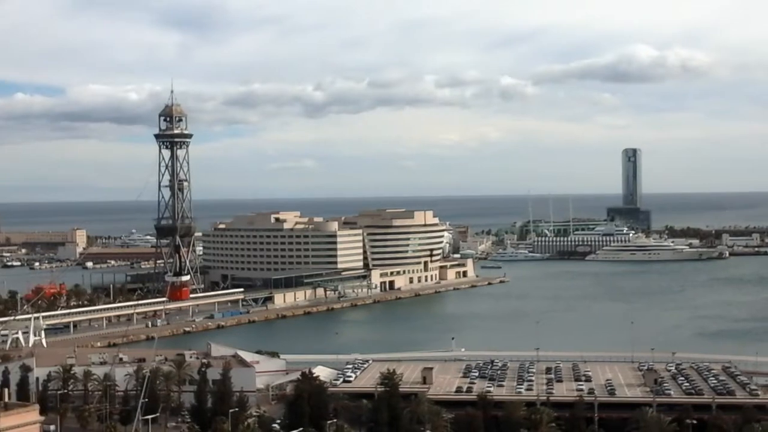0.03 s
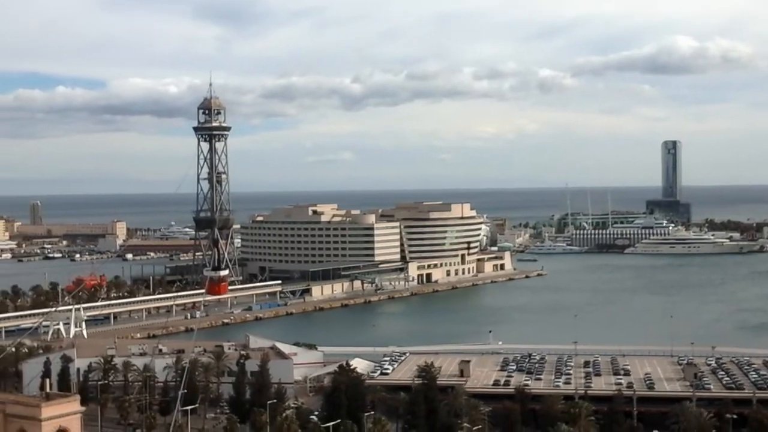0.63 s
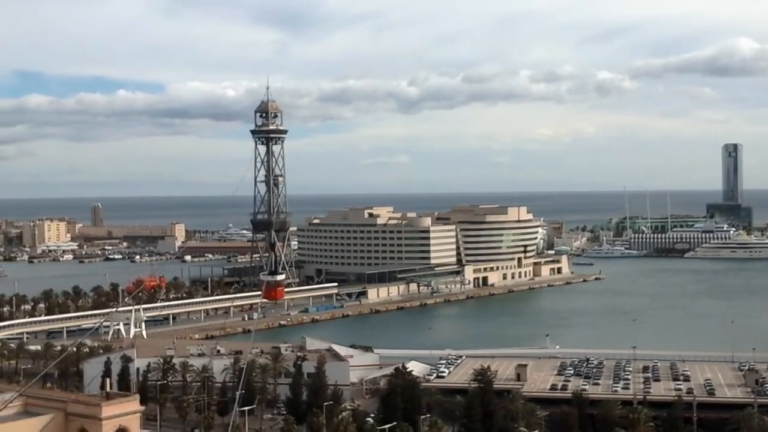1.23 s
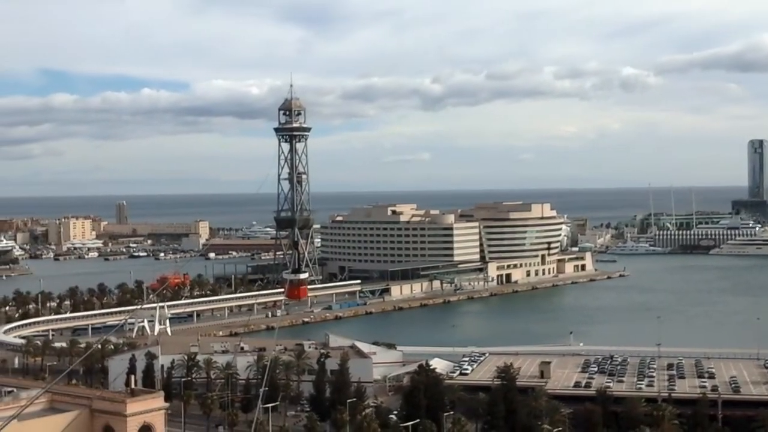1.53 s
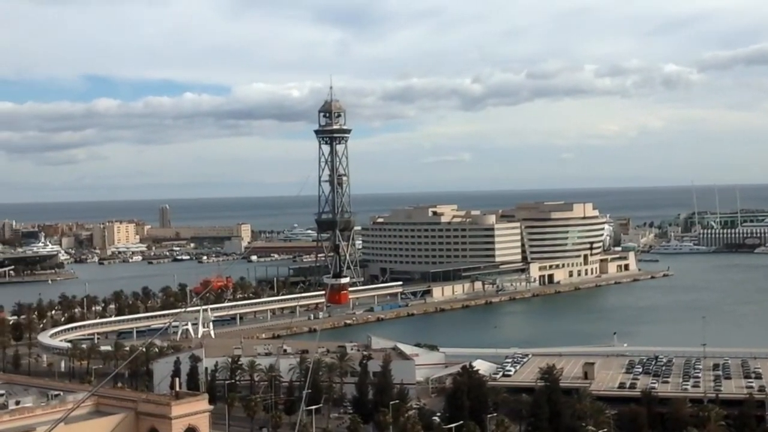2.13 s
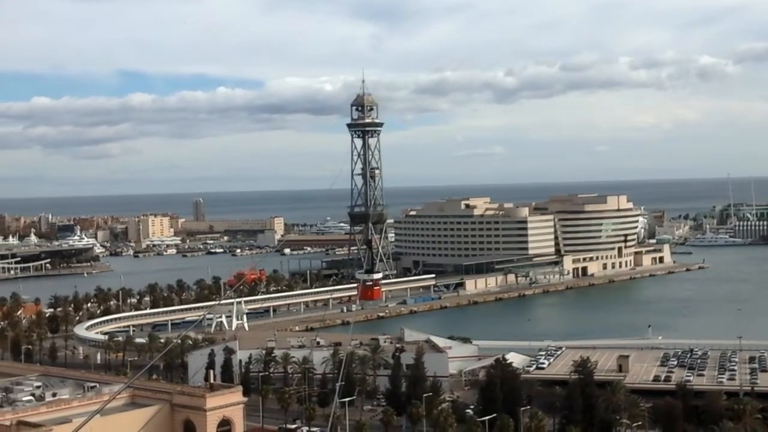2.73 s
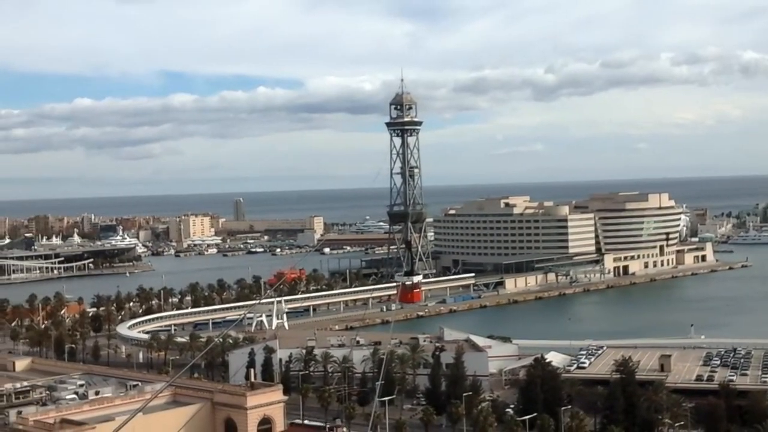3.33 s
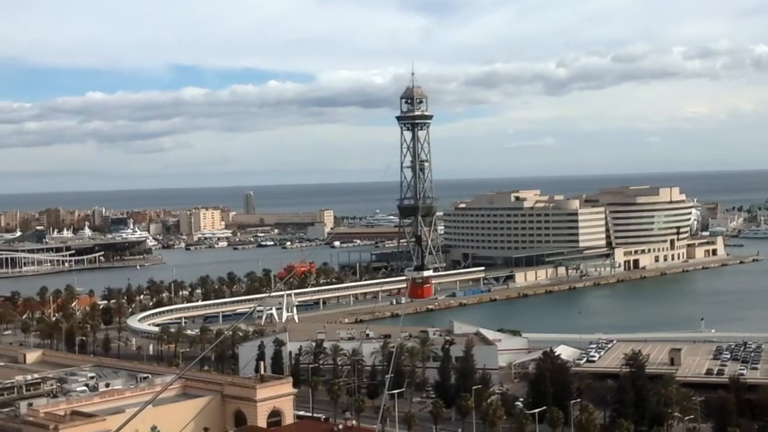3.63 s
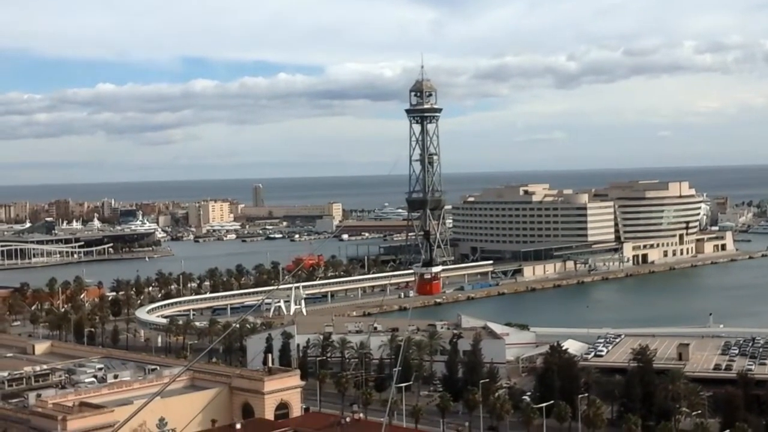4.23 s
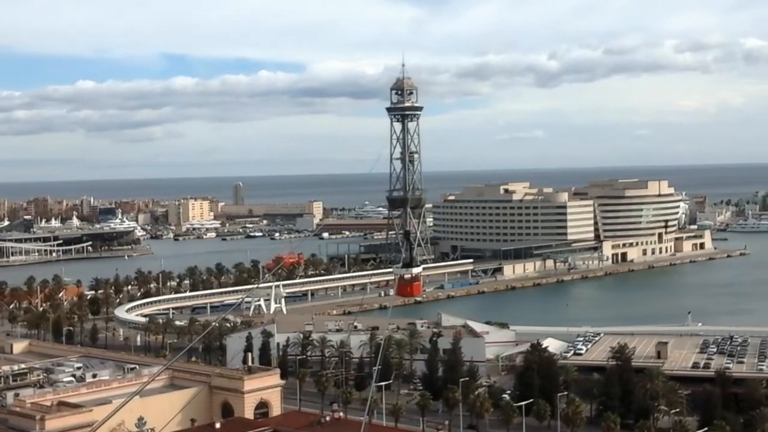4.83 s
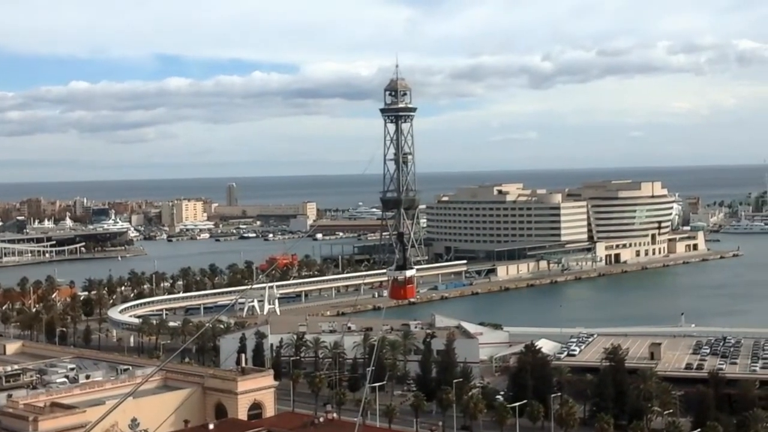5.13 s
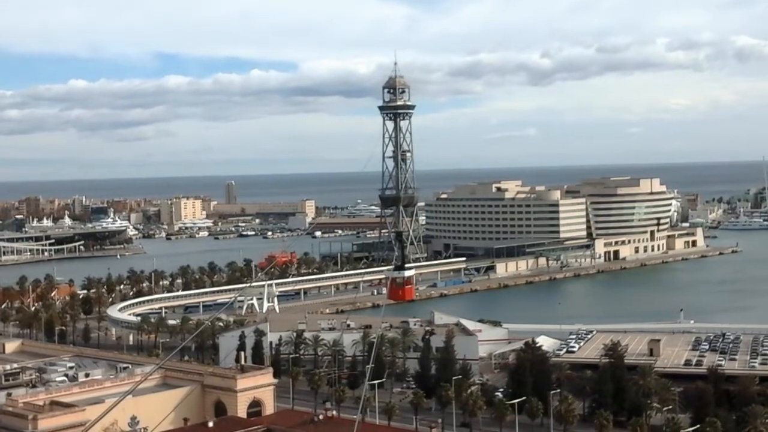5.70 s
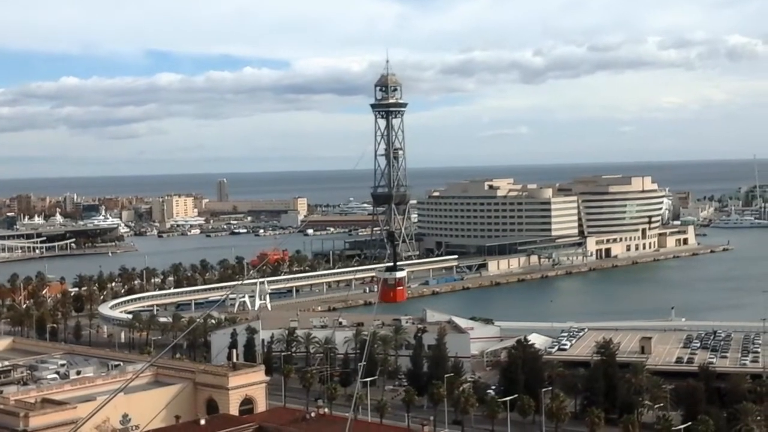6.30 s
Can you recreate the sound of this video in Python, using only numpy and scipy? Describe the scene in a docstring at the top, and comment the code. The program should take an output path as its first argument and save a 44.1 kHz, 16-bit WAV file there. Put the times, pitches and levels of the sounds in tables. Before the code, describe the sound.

Distant traffic roars under wind buffeting the microphone, while nearer vehicles rush past with echoing clatters and dull metal clanks.

```python
"""A breezy terrace high above a harbour. Far traffic roars and drones throughout, wind rumbles on the
microphone and the recorder hisses. First a nearer vehicle rushes by with echoing clatters, a dull
clank and a tiny tick. From about 1 s, swirls of air thump the microphone and softer rushes pass, with
a double rustle near 2 s. After 4 s a thin whine comes and goes and the drone surges briefly. Near 6 s
come more clatters, a second clank and a loud rush, then a short low thump as the sound cuts off."""
import sys
import numpy as np
from scipy import signal
from scipy.fft import rfft, irfft, next_fast_len
from scipy.io import wavfile

SR = 44100
rng = np.random.default_rng(int(sys.argv[2]) if len(sys.argv) > 2 else 0)


def pcm_store(signal):
    """Save signal as 16-bit PCM."""
    levels = np.round(np.clip(np.atleast_2d(signal), -1, 1) * 32767)
    wavfile.write(sys.argv[1], SR, levels.astype(np.int16).T)


N = 284886

# The tone colour of the far traffic. Each row: frequency in Hz, relative level in dB.
TRAFFIC_COLOUR = [(30, -32.5), (65, 1.5), (160, 4), (220, 2), (300, 2.5), (380, -3), (600, 0), (760, -0.5),
                  (890, -0.5), (1060, -5.5), (2000, -17), (2950, -30), (3600, -45), (4600, -53.5),
                  (8000, -78.5)]
# The low notes of far engines. Each row: pitch in Hz, width in Hz, relative level in dB.
ENGINE_NOTES = [(165.5, 35, 1.5), (232.4, 18, -7), (298, 37, -6.5)]
# Moments when the drone swells. Each row: start in seconds, length in seconds, relative level in dB.
ENGINE_SURGES = [(4.677, 0.064, -34.5), (4.876, 0.07, -25.5), (4.983, .05, -31.5), (5.083, 0.049, -28.5)]
# The tone colour of the wind. Each row: frequency in Hz, relative level in dB.
WIND_COLOUR = [(22, -48.5), (35, -27.5), (50, -5.5), (70, 2), (130, 1), (170, -4.5), (230, -2.5),
               (310, -15), (420, -26), (800, -35), (2000, -70.5), (8000, -130)]
# Swells of the rumble: gusts, then in the last row the short low thump as the sound cuts off.
# Each row: start in seconds, length in seconds, relative level in dB, extra deep bass in dB.
RUMBLE_SWELLS = [(0.403, 0.06, -25, 0.5), (0.805, 0.17, -26.5, 6.5), (1.214, 0.066, -23, -12),
                 (1.443, 0.025, -34.5, 2.5), (1.71, 0.12, -33, 8), (2.103, 0.042, -27, 7.5),
                 (2.438, 0.16, -26, 9), (2.593, 0.23, -28.5, 1.5), (2.862, 0.17, -29, 9),
                 (3.31, 0.065, -29.5, 4.5), (4.018, 0.057, -27.5, 6), (6.21, 0.091, -31, 8),
                 (6.418, 0.05, -12.5, 2)]
# The tone colour of rushes and clatters. Each row: frequency in Hz, relative level in dB.
STREET_COLOUR = [(200, -26.5), (450, -6), (720, -2.5), (900, 5.5), (1080, -4.5), (1300, -1.5), (1800, -5.5),
                 (2500, -10), (3300, -17.5), (3900, -23.5), (4500, -27.5), (5500, -35.5), (7200, -42),
                 (10000, -62)]
# Passing vehicles. Each row: loudest moment in seconds, time to fade by about 5 dB in seconds,
# level in dB, treble limit in Hz.
VEHICLE_PASSES = [(0.614, 0.33, -37.5, 4860), (1.779, 0.38, -43, 3620), (2.546, 0.47, -49.5, 4340),
                  (3.701, .4, -50.5, 4960), (5.897, 0.27, -36.5, 5450), (6.43, 0.13, -44.5, 5000)]
# Far knocks. Each row: start in seconds, rise time in seconds, level in dB, treble limit in Hz.
FAR_KNOCKS = [(.456, 0.054, -30.5, 4300), (0.57, 0.055, -42.5, 5500), (5.55, 0.025, -39, 5500),
              (5.75, 0.045, -29.5, 5600), (5.825, 0.076, -27, 5530)]
# Blows on metal. Each row: start in seconds, relative level in dB, brightness in dB per octave
# around 1000 Hz, a number that multiplies the pitch.
METAL_BLOWS = [(0.466, 0, -1.5, 1), (5.864, -7, 5, 1.12)]
# The notes the metal rings with. Each row: base pitch in Hz, width in Hz, relative level in dB.
METAL_NOTES = [(558, 170, -28), (793, 110, -29.5), (1140, 210, -32), (1803, 380, -31.5), (2210, 81, -33.5),
               (2560, 57, -45), (4070, 160, -57.5)]
# Low thumps: swirls of air on the microphone, then in the last row part of the closing thump.
# Each row: middle in seconds, relative level in dB, pitch in Hz.
LOW_THUMPS = [(0.982, -16, 149), (1.049, -12.5, 114), (1.071, -15, 131), (1.264, -7.5, 150),
              (1.332, -11, 242), (1.396, -13.5, 150), (1.504, -15.5, 125), (1.76, -13, 165),
              (1.834, -8.5, 141), (1.888, -11, 119), (2.414, -12, 160), (2.502, -9.5, 100),
              (2.548, -14, 100), (2.635, -13.5, 110), (2.661, -13.5, 150), (2.696, -10.5, 120),
              (2.754, -2, 219), (2.76, -12, 94), (2.813, -12.5, 290), (2.822, -10.5, 99.6),
              (2.873, -12, 141), (2.952, -16, 125), (3.361, -17.5, 120), (3.479, -13.5, 135),
              (4.191, -13.5, 84), (4.205, -14, 170), (4.218, -10, 114), (6.227, -13, 89), (6.335, -18, 141),
              (6.452, -13, 158)]
# Two rustles. Each row: start in seconds, length in seconds, level in dB.
DRY_SWISHES = [(1.788, .055, -46.5), (1.893, 0.045, -51.5)]
# Their tone colour. Each row: frequency in Hz, relative level in dB.
SWISH_COLOUR = [(1200, -16), (2300, 2), (3050, -2.5), (3650, -10), (4150, -22.5), (5600, -37), (8000, -54)]
# Thin whines. Each row: start in seconds, length in seconds, relative level in dB, first pitch in Hz,
# last pitch in Hz, level of the rough edge in dB compared with the core.
WHINE_NOTES = [(4.075, 0.21, -85.5, 6190, 6100, -0.5), (4.31, .14, -87, 6130, 6130, -2),
               (4.595, 0.13, -83, 6220, 6270, -3), (4.8, .44, -93.5, 6230, 6220, -4.5),
               (5.251, 0.34, -79.5, 6230, 6220, -2.5), (5.525, 0.58, -79, 6210, 6220, -2),
               (6.112, .28, -70, 6200, 6145, -9)]


def undb(db):
    """Turn decibels (dB) into a number to multiply a sound by."""
    return 10 ** (np.asarray(db) / 20)


def unit(x):
    """Scale a signal so that its average strength (root mean square) is 1."""
    return x / np.sqrt(np.mean(x ** 2))


def wander(rate):
    """A smooth random curve of strength 1 that changes about rate times a second."""
    size = next_fast_len(N)
    hz = np.fft.rfftfreq(size, 1 / SR)
    spectrum = rfft(rng.standard_normal(size)) * np.exp(-(hz / rate) ** 2)
    return unit(irfft(spectrum, size)[:N])


def noise_bands(colour, count):
    """Split noise of a given tone colour into bands, low to high; return their centres and sounds."""
    hz, db = np.transpose(colour)
    size = next_fast_len(N)
    octave = np.log2(np.fft.rfftfreq(size, 1 / SR) + 1)
    spectrum = rfft(rng.standard_normal(size)) * undb(np.interp(octave, np.log2(hz), db))
    centres = np.geomspace(hz[0], hz[-1], count)
    shares = [np.interp(octave, np.log2(centres), row) for row in np.eye(count)]
    bands = np.array([irfft(spectrum * share, size)[:N] for share in shares])
    return centres, bands / np.std(bands.sum(axis=0))


def blurred_tone(hz, width_hz):
    """A tone that wavers at random; the wider it is, the more it sounds like noise."""
    phase = 2 * np.pi * np.cumsum(hz * np.ones(N)) / SR
    return wander(width_hz) * np.cos(phase) + wander(width_hz) * np.sin(phase)


def envelope(start, length, rise_s, fade_s):
    """A loudness curve: it rises, holds until length seconds after the start, then dies away."""
    age = np.arange(N) / SR - start
    return np.clip(age / rise_s, 0, 1) * np.exp(-np.maximum(age - length, 0) / fade_s)


def swelling(steady_db, swells, rise_s, fade_s):
    """A loudness curve that adds short swells to a steady level."""
    power = sum((undb(db) * envelope(start, length, rise_s, fade_s)) ** 2 for start, length, db in swells)
    return np.sqrt(undb(steady_db) ** 2 + power)


def street_noise(events, steepness=7):
    """Broad noise shaped by events, each a loudness curve and a treble limit in Hz."""
    centres, bands = noise_bands(STREET_COLOUR, count=14)
    powers = np.array([loudness ** 2 for loudness, _ in events])
    limits = np.array([limit_hz for _, limit_hz in events])
    shares = [1 / (1 + (hz / limits) ** steepness) for hz in centres]
    return sum(band * np.sqrt(share @ powers) for band, share in zip(bands, shares))


def far_traffic(level_db=-29.5, swell_db=0.3, flicker_db=0.65):
    """Many far engines and tyres blend; moving air makes each band waver on the long way up."""
    _, bands = noise_bands(TRAFFIC_COLOUR, count=12)
    roar = sum(band * undb(flicker_db * wander(rate=7)) for band in bands)
    return roar * undb(level_db - swell_db * wander(rate=1))


def engine_drone(steady_db=-41.5):
    """Heavy engines far below, heard only through the low notes they ring with."""
    loudness = swelling(steady_db, ENGINE_SURGES, rise_s=0.048, fade_s=0.029)
    return loudness * sum(undb(db) * blurred_tone(hz, width) for hz, width, db in ENGINE_NOTES)


def wind(breeze_db=-29.5, gain_db=-3.5, deep_hz=105, rise_s=0.03, fade_s=0.13):
    """Air churns on the microphone, swelling and deepening in gusts; the rumble ends in a thump."""
    swells = [(start, length, db) for start, length, db, _ in RUMBLE_SWELLS]
    deep_swells = [(start, length, db + extra) for start, length, db, extra in RUMBLE_SWELLS]
    loudness = swelling(breeze_db, swells, rise_s, fade_s)
    bass_gain = swelling(breeze_db, deep_swells, rise_s, fade_s) / loudness
    centres, bands = noise_bands(WIND_COLOUR, count=12)
    depths = 1 / (1 + (centres / deep_hz) ** 4)  # near 1 for deep bands, near 0 for high ones
    rumble = sum(band * bass_gain ** depth for band, depth in zip(bands, depths))
    churn_db = 0.9 * wander(rate=30) + 1.05 * wander(rate=2)
    return rumble * unit(undb(churn_db)) * loudness * undb(gain_db)


def passing_vehicles(falloff=1.61, flutter_db=0.74):
    """Each nearer vehicle's fluttering rush grows as it comes closer and fades as it leaves."""
    t, passes = np.arange(N) / SR, []
    for closest_s, fade_s, db, limit_hz in VEHICLE_PASSES:
        distance = np.hypot(1, (t - closest_s) / fade_s)  # 1 at the closest point
        passes.append((undb(db) / distance ** falloff, limit_hz))
    return street_noise(passes) * undb(flutter_db * wander(rate=30))


def clatters(echo_s=0.16, rattle_db=1.0):
    """Far knocks, smeared by the town's echo into bursts that start quickly and fade smoothly."""
    bursts = [(undb(db) * envelope(start, rise, rise, echo_s), limit_hz)
              for start, rise, db, limit_hz in FAR_KNOCKS]
    return street_noise(bursts) * undb(rattle_db * wander(rate=30))


def clanks(rise_s=0.013, ring_s=0.3):
    """Struck metal things of slightly different size ring; the long way blurs each note."""
    out = 0
    fade_s = ring_s / np.log(1000)  # 60 dB quieter after ring_s
    for start, blow_db, bright_db, pitch in METAL_BLOWS:
        ring = sum(undb(db + bright_db * np.log2(hz / 1000)) * blurred_tone(hz * pitch, width)
                   for hz, width, db in METAL_NOTES)
        out = out + ring * undb(blow_db) * envelope(start, rise_s, rise_s, fade_s)
    return out


def tick(level_db=-70):
    """One faint pinpoint of bright noise close by that dies at once."""
    loudness = envelope(start=0.747, length=0.001, rise_s=0.001, fade_s=0.003)
    return blurred_tone(hz=7000, width_hz=2500) * undb(level_db) * loudness


def thumps(gain_db=-4.0, width_cycles=0.53, ragged=0.49, steepen=0.37):
    """Each low thump is one uneven push and pull of pressure; hard ones flip more sharply."""
    t, out = np.arange(N) / SR, np.zeros(N)
    wobble = ragged * wander(rate=250)
    for middle_s, db, hz in LOW_THUMPS:
        near = np.abs(t - middle_s) < 0.05
        cycles = (t[near] - middle_s) * hz
        phase = 2 * np.pi * cycles + wobble[near]
        loudness = undb(db + gain_db) * np.exp(-0.5 * (cycles / width_cycles) ** 2)
        out[near] -= loudness * np.sin(phase + steepen * undb(db) * np.sin(phase))
    return out


def rustles():
    """Two short, dry swishes of noise that stand out above the dull traffic."""
    _, bands = noise_bands(SWISH_COLOUR, count=2)
    loudness = sum(undb(db) * envelope(start, length, rise_s=0.02, fade_s=0.033)
                   for start, length, db in DRY_SWISHES)
    return bands.sum(axis=0) * loudness


def whine(gain_db=0.5, waver_hz=16, flutter_db=0.6):
    """A high, wavering tone like a far brake: a narrow core with a wider, rougher edge."""
    t, out = np.arange(N) / SR, 0
    waver = waver_hz * wander(rate=14)
    for start, length, db, first_hz, last_hz, edge_db in WHINE_NOTES:
        hz = np.interp(t, [start, start + length], [first_hz, last_hz]) + waver
        tone = blurred_tone(hz, width_hz=50) + undb(edge_db) * blurred_tone(hz, width_hz=210)
        out = out + tone * undb(db + gain_db) * envelope(start, length, rise_s=0.08, fade_s=0.16)
    return out * undb(flutter_db * wander(rate=14))


def scene():
    """Add up everything that reaches the one microphone."""
    background = far_traffic() + engine_drone() + wind()
    events = passing_vehicles() + clatters() + clanks() + tick() + thumps() + rustles() + whine()
    return (background + events)[np.newaxis]


def record(dry, low_hz=42, top_hz=15500, hiss_db=-77.5):
    """The recorder thins the deepest bass, adds its own hiss and cuts the highest treble."""
    bass_cut = signal.butter(2, low_hz, "high", fs=SR, output="sos")
    treble_cut = signal.ellip(10, 0.1, 80, top_hz, fs=SR, output="sos")
    hiss = undb(hiss_db) * rng.standard_normal(dry.shape)
    return signal.sosfilt(treble_cut, signal.sosfilt(bass_cut, dry) + hiss)


dry = scene()
out = record(dry)
pcm_store(out)
```